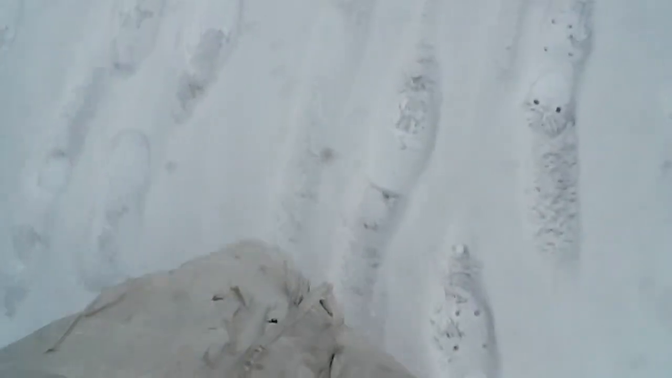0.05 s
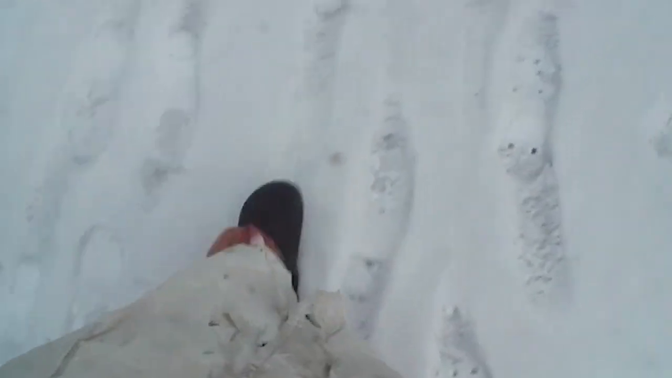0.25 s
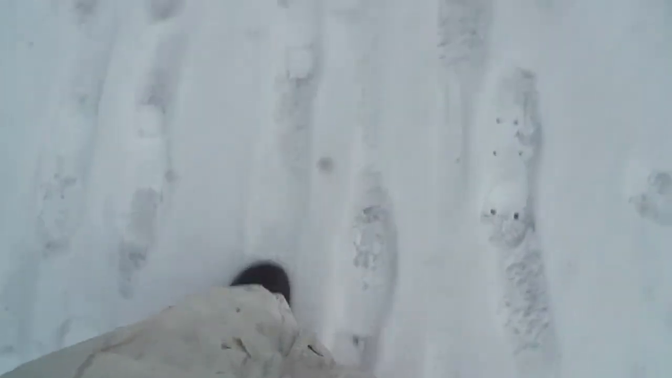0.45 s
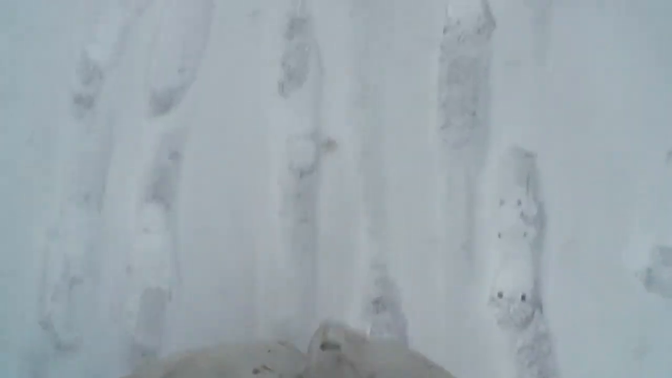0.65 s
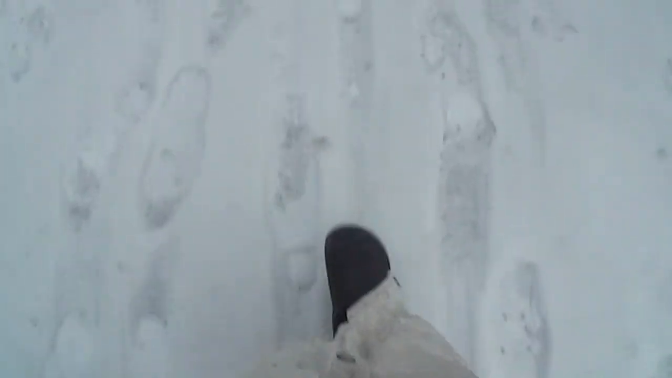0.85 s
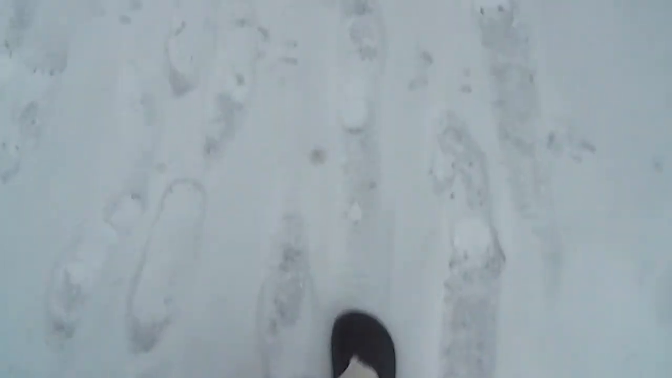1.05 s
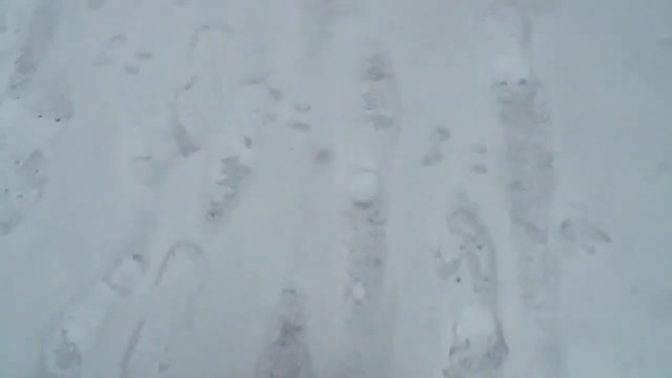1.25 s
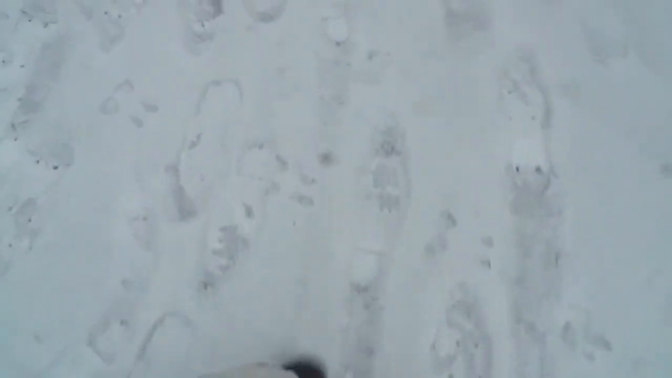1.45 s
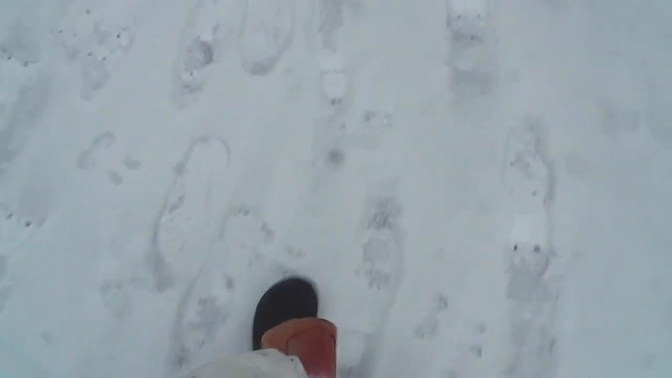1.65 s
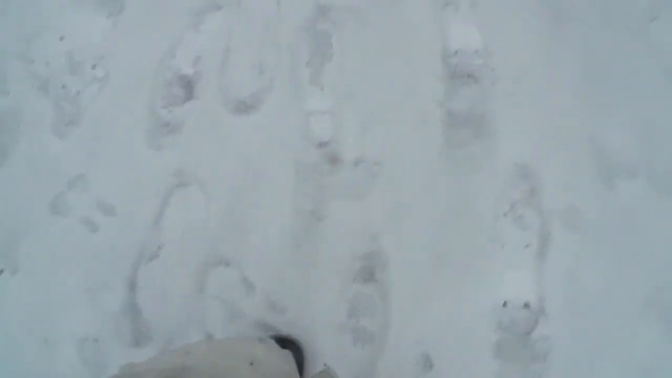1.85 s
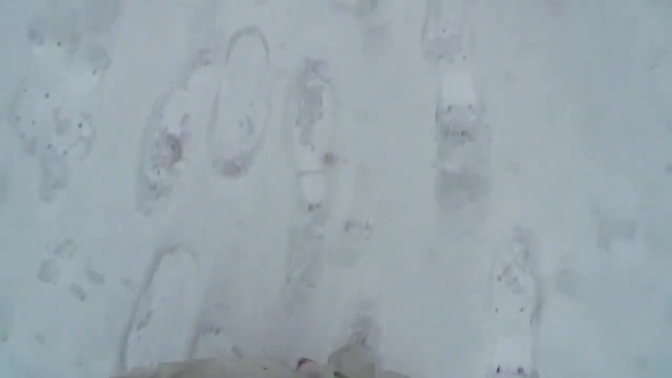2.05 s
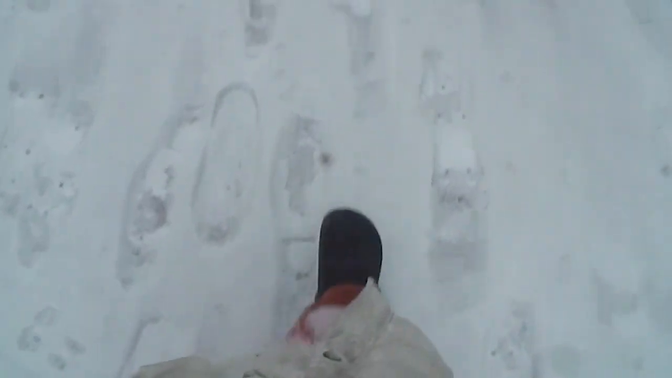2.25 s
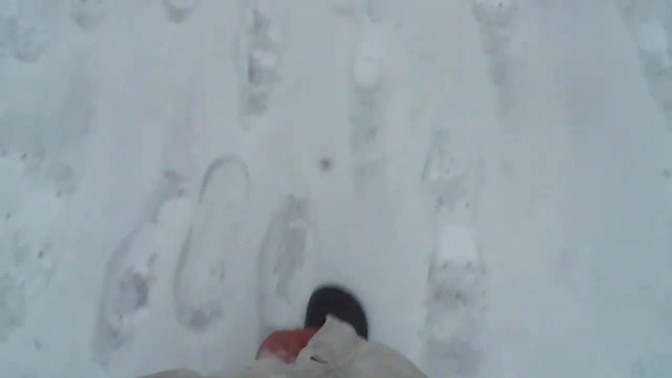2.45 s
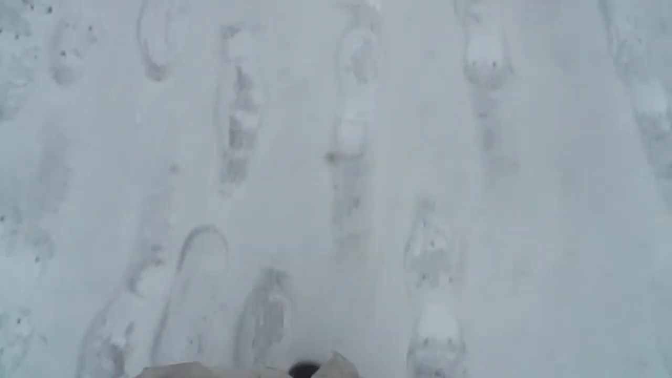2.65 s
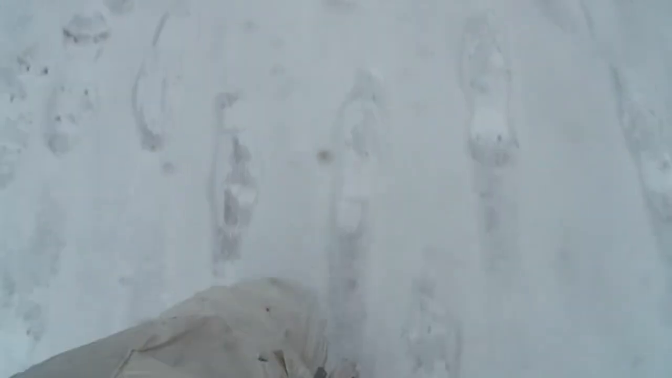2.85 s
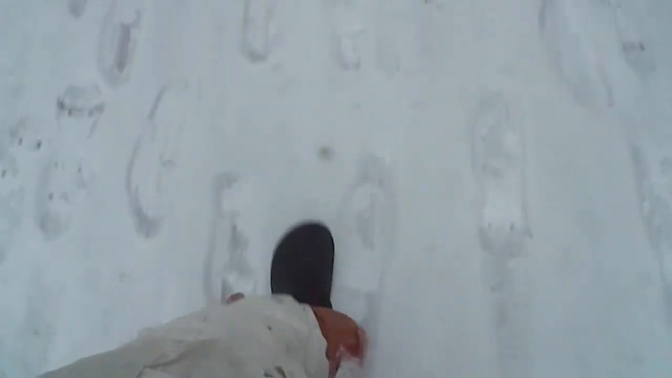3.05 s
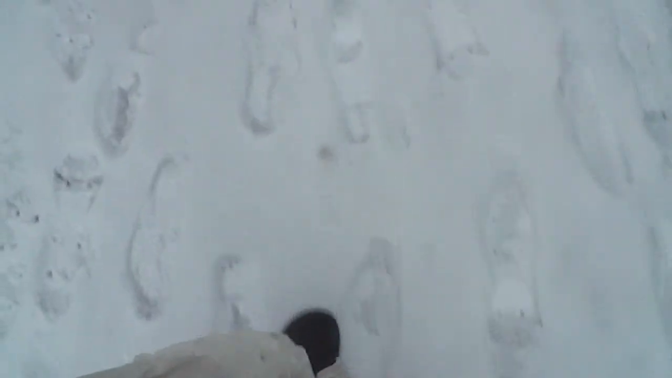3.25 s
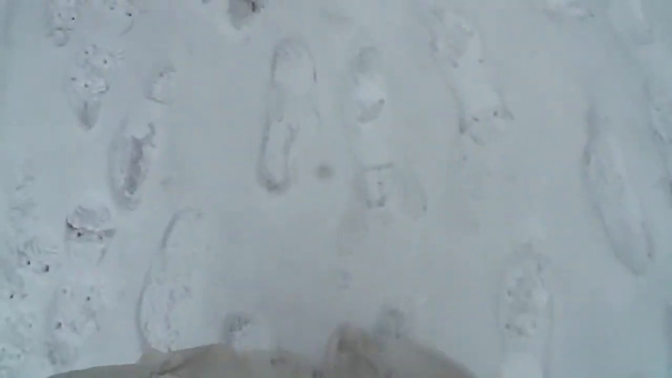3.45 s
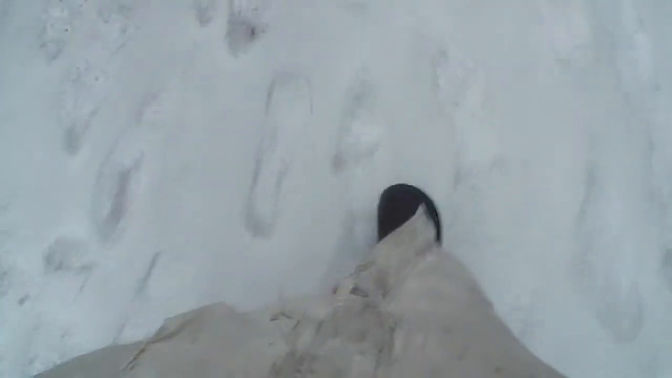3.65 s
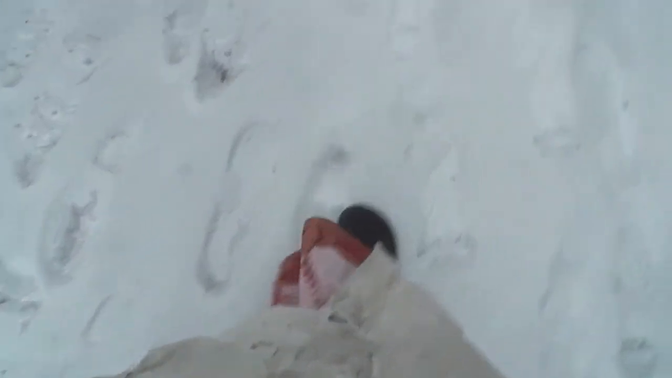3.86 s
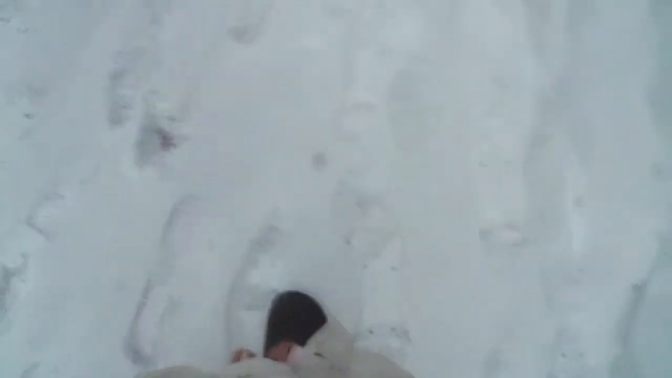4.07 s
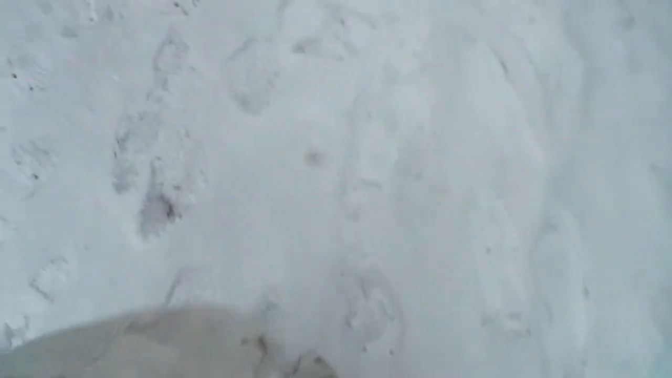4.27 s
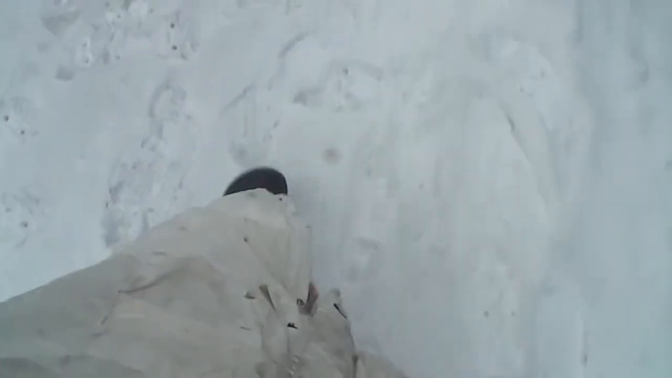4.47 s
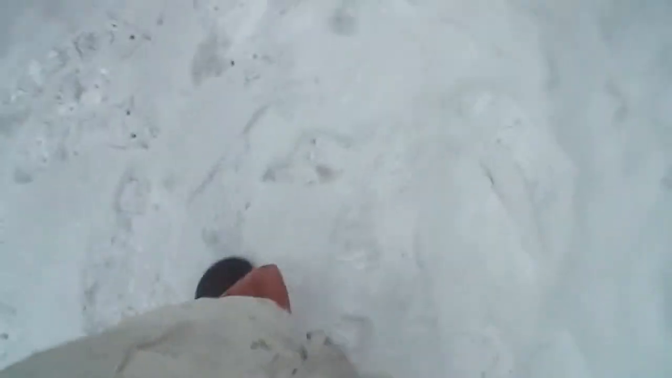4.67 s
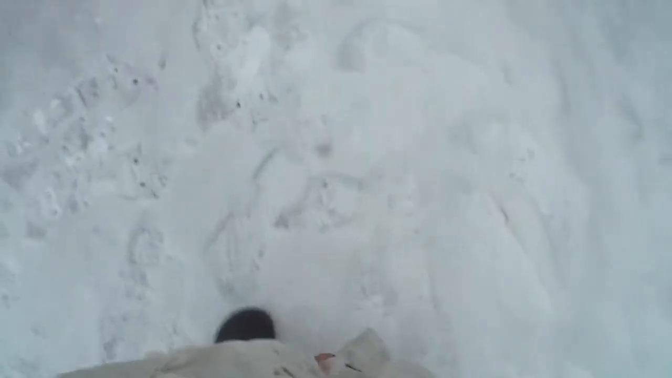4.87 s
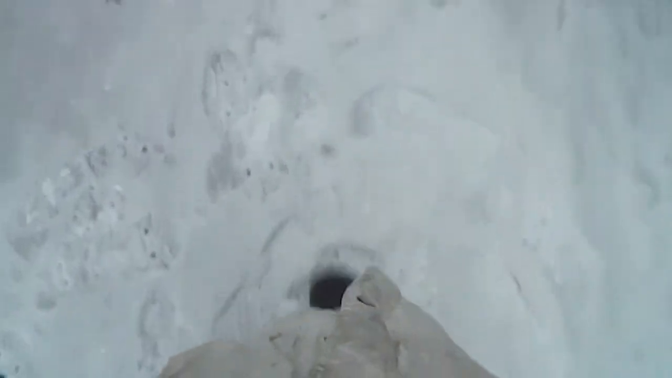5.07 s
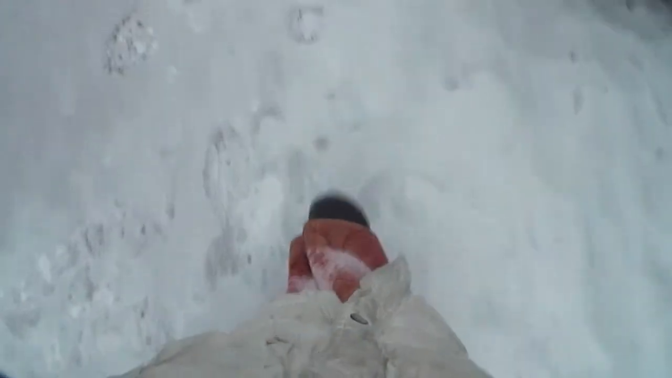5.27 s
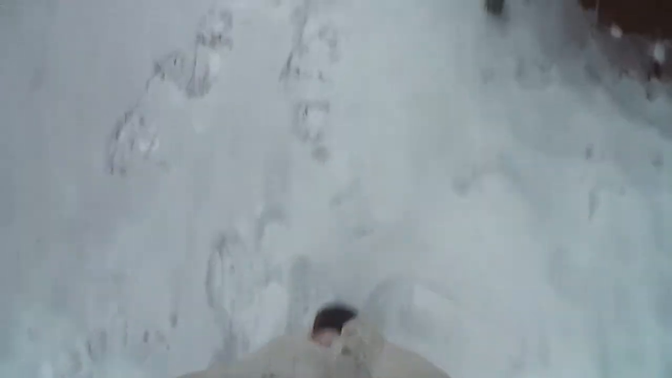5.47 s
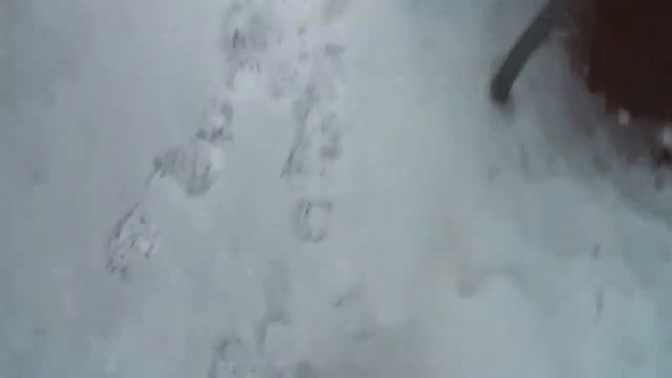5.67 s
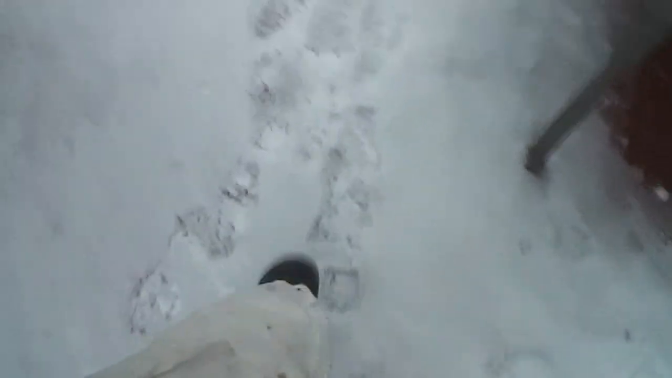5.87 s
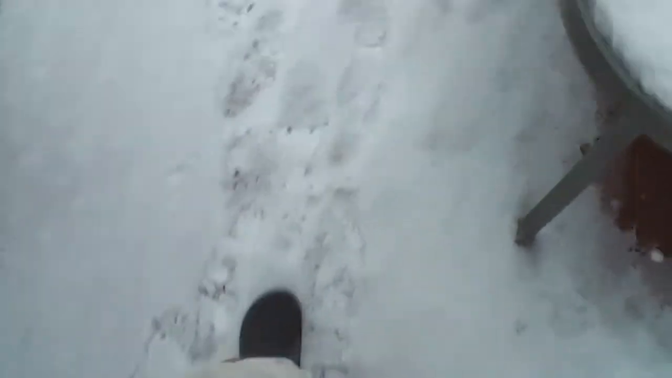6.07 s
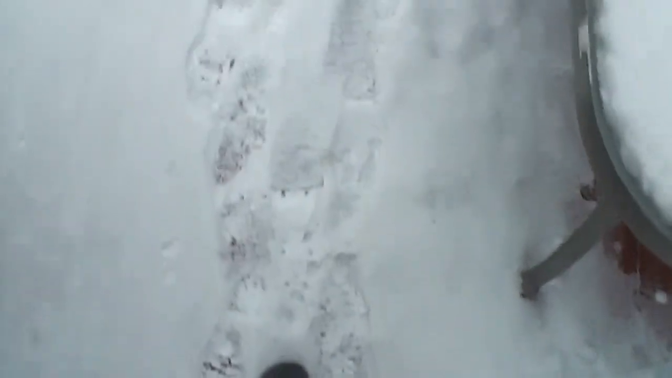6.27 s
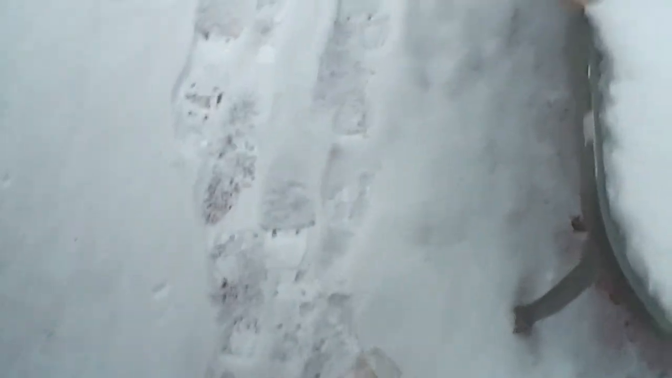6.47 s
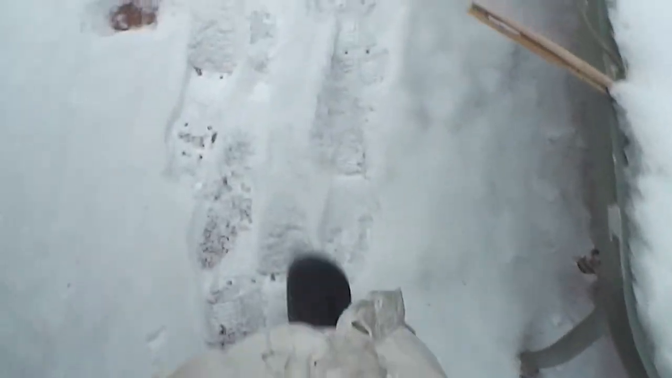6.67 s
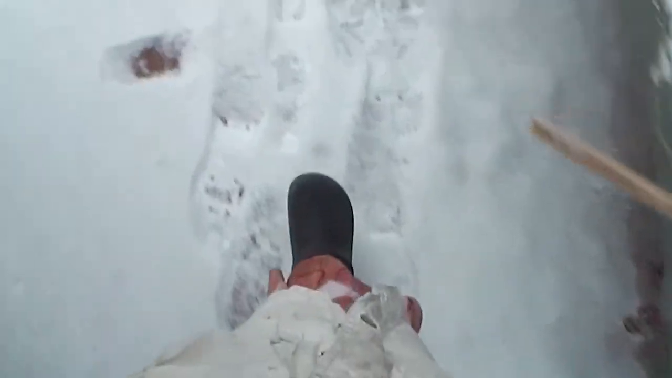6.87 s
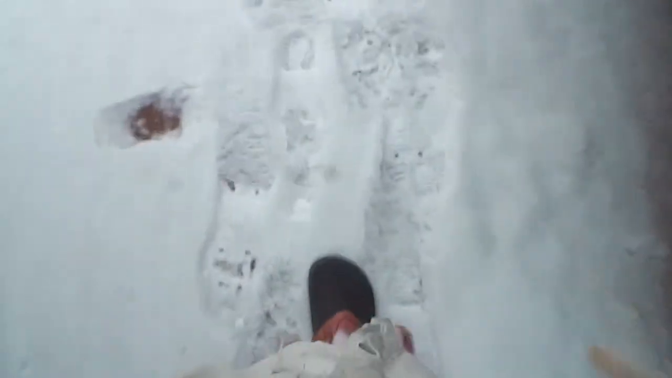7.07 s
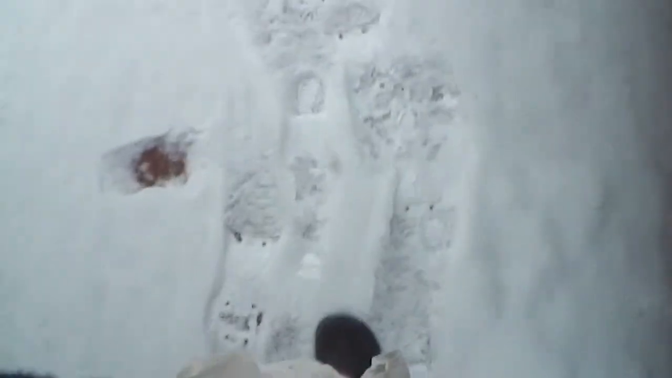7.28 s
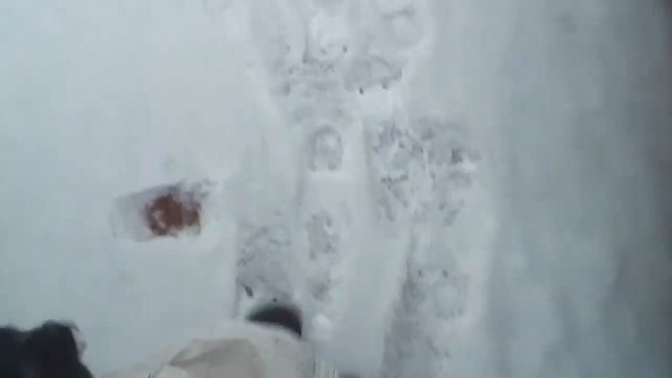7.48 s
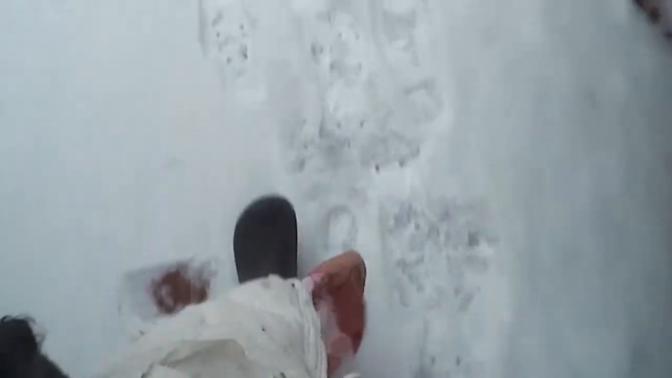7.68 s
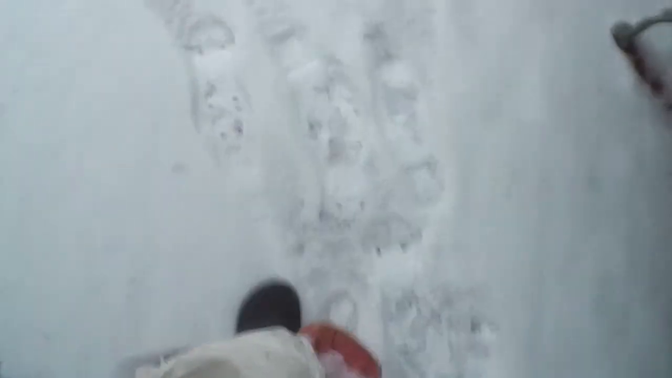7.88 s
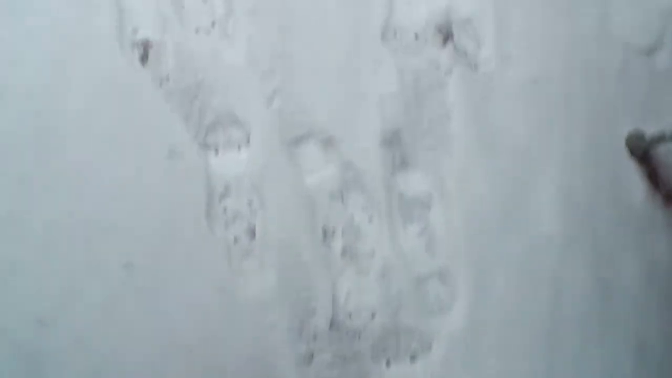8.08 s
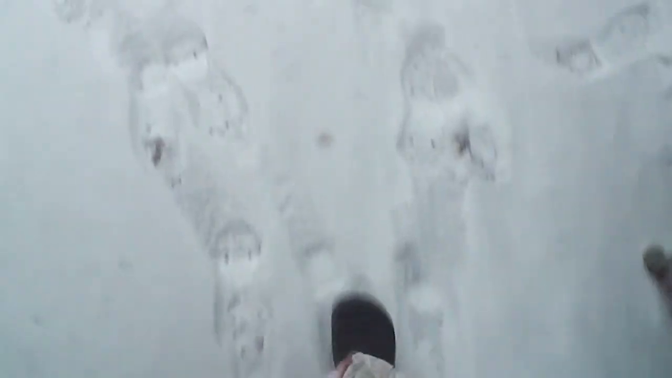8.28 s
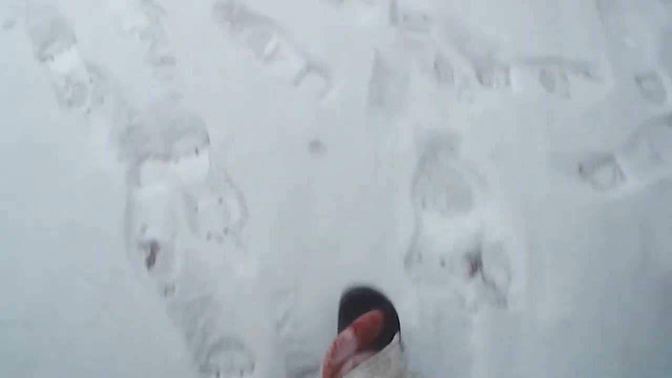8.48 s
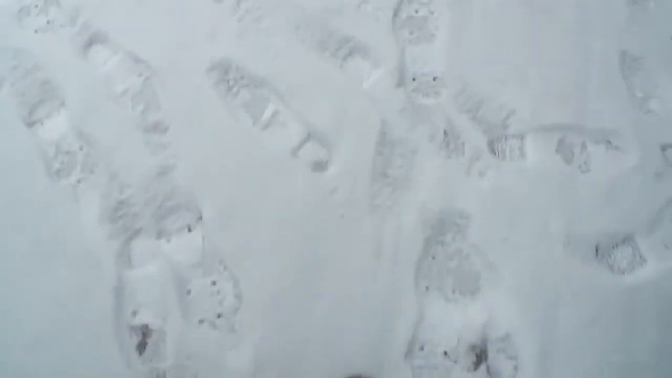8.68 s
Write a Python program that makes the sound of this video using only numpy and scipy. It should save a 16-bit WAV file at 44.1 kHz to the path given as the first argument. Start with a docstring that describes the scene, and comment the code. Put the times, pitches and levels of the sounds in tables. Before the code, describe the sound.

Outdoors in quiet air, boots crush crisp snow at a regular walking pace, heard near and slightly below in dry stereo. Heels break in with low, crumbly crunches; soles follow with a denser crackling crush, brittle snaps and fine icy hiss. Loose crumbs tick between a few steps. Thin bird whistles appear faintly from about two seconds, then a quick group of buzzy chirps near seven seconds as the air grows slightly louder.

```python
"""Quiet open air, a filtered noise, lasts throughout; from the start someone walks below us through crusty snow.
Each step begins as a heel breaks in with a few dull crunches: short pops with crumbling grains and a boot thud.
Then the crust collapses and the sole crushes the snow in a shower of small pops, sharp cracks and icy fizz.
From about two seconds, small birds now and then give faint gliding whistles; loose crumbs tick on the crust.
Late in the walk the birds' buzzy calls are clearer and the air is a little louder."""
import sys
import numpy as np
from scipy import signal
from scipy.io import wavfile
from scipy.ndimage import uniform_filter1d

SR = 44100
rng = np.random.default_rng(int(sys.argv[2]) if len(sys.argv) > 2 else 0)


def put_to_file(sound):
    """Save the sound as 16-bit audio at rate SR, in the file named by the first command-line argument."""
    columns = np.atleast_2d(sound).T  # one column per channel
    safe = np.clip(columns, -1, 1)
    whole_steps = np.round(safe * 32767)
    wavfile.write(sys.argv[1], SR, whole_steps.astype(np.int16))


N = 384993
T = np.arange(SR // 5) / SR  # time inside one short sound [s]
MIDDLE_S = T.mean()
EDGE_HZ = 16100  # nothing much is heard above this

# still outdoor air, its colour: (frequency [Hz], level per Hz [dB])
AIR_COLOUR = [(18, -35), (30, -4), (540, 12), (616, 11), (1220, 9), (3060, -6.5), (7470, -6.5), (8300, -12),
              (9970, -13), (14400, -13), (16000, -15)]
# slow drift added to the air's level: (time [s], change [dB])
AIR_LEVEL_DRIFT = [(0, 1), (2.7, -0.5), (4.3, 0), (5.1, -0.5), (6.8, 4.5), (8.7, 5)]
AIR_DB = -49  # before the drift
# bird calls: (time [s], length [s], start pitch [Hz], end pitch [Hz], level [dB], buzz [0-1])
BIRD_CALLS = [(1.963, 0.051, 5100, 4100, -67, 0.1), (2.002, 0.049, 6900, 8100, -61, 0.2),
              (3.793, 0.11, 5000, 4500, -58, 0.4), (5.14, 0.066, 7900, 7200, -65, 0.1),
              (5.81, 0.07, 4630, 4700, -61, 0.34), (6.68, 0.06, 5700, 7160, -46.5, 0.7),
              (6.776, 0.037, 4830, 6360, -49.5, 0.65), (6.86, 0.054, 5150, 6600, -46, 0.7)]

# colour of breaking snow: (frequency [Hz], level per Hz [dB])
SNOW_COLOUR = [(18, -35), (30, -6), (86, 8), (215, -4), (336, 4), (415, 2.5), (512, 7), (649, 0),
               (1040, -4.5), (1860, -8), (2830, -20.5), (3770, -16.5), (7870, -22.5), (14800, -30),
               (16000, -39)]
# hollow ring of a boot on packed snow, before each blow detunes it:
# (pitch [Hz], time to fall by 60 dB [s], level among the modes [dB])
BOOT_MODES = [(125, 0.33, -16.5), (180.6, 0.21, -2.5), (228.4, 0.25, 0), (298.2, 0.12, 4.5),
              (371.6, 0.14, 4.5)]

# loose crumbs of crust skitter from a swinging boot: (time [s], length [s], level [dB])
CRUMB_FALLS = [(2.885, 0.21, -48), (7.27, 0.21, -50.5), (7.516, 0.32, -52.5)]
# dull crunches, as a boot packs the snow:
# (time [s], level over 10 ms [dB], pitch [Hz], boot thud relative to the crunch [dB])
DULL_CRUNCHES = [(0.022, -21.5, 700, 0), (0.091, -22.5, 615, -6), (0.15, -23, 875, -1),
                 (0.231, -26, 910, 1.5), (0.295, -19.5, 720, -1), (0.692, -22.5, 1130, 0.5),
                 (0.819, -23.5, 955, 4), (0.892, -24.5, 810, 2), (0.947, -24, 860, -4),
                 (0.98, -25, 1030, -11), (1.007, -20.5, 760, 1.5), (1.414, -23, 790, 1),
                 (1.47, -28, 812, -4), (1.509, -19, 790, 0), (1.575, -21, 900, -8), (1.614, -24, 700, 3),
                 (1.667, -25.5, 620, 1.5), (2.042, -28.5, 1060, -4), (2.076, -25, 1040, 0.5),
                 (2.119, -32.5, 1060, 2), (2.224, -24.5, 880, -3.5), (2.336, -21, 810, -0.5),
                 (2.375, -18.5, 910, 0), (2.791, -22, 1150, -4), (2.831, -24.5, 930, 0),
                 (2.857, -20, 806, -2), (2.892, -20.5, 810, -3), (2.934, -24.5, 840, -13),
                 (2.97, -21, 720, 0), (3.007, -20.5, 560, -4), (3.062, -19, 550, 1), (3.365, -19, 1150, -8),
                 (3.522, -19.5, 1100, -3.5), (3.622, -16, 1160, 0), (3.648, -26, 910, 8),
                 (3.693, -17, 780, -2.5), (3.737, -25, 870, 4), (3.811, -30, 870, -13),
                 (3.913, -14.5, 1110, -4.5), (4.433, -18, 846, -4), (4.529, -22.5, 870, -6),
                 (4.618, -25.5, 625, -2.5), (5.213, -21, 1120, -6.5), (5.257, -21, 1190, -12),
                 (5.635, -13, 935, -15.5), (5.713, -23, 1180, -3), (5.884, -35, 845, -4),
                 (5.951, -17.5, 1350, -9.5), (6.044, -21.5, 1010, -5), (6.474, -22, 920, -9),
                 (6.647, -30.5, 795, 0.5), (6.851, -24.5, 860, -10), (6.915, -17.5, 634, -0.5),
                 (6.988, -17, 725, -3), (7.492, -27.5, 970, -7), (7.66, -24.5, 915, -3.5),
                 (8.153, -23, 615, -1), (8.297, -29.5, 885, 0.5), (8.378, -23, 1320, -1),
                 (8.469, -21, 790, -2), (8.521, -21.5, 1255, -6)]
# sharp cracks of the icy crust: (time [s], level over 10 ms [dB], ice fizz relative to the crack [dB])
SHARP_CRACKS = [(0.5681, -21, -21), (0.6004, -21, -19), (1.1667, -23, -25), (1.239, -25, -23),
                (1.3458, -30, -16), (1.8509, -23, -18), (1.8854, -24, -13), (2.0125, -39, -11),
                (2.5946, -20, -17), (3.3042, -24, -14), (3.332, -19, -16), (3.4077, -25, -12),
                (3.4518, -23, -16), (3.4756, -23, -15), (3.5821, -26, -21), (4.0148, -20, -13),
                (4.0375, -15.5, -16), (4.0631, -22, -8), (4.1168, -19, -12), (4.1495, -28, -8),
                (4.7207, -24, -18), (4.7744, -23, -18), (4.8354, -24, -12), (4.8724, -22, -12),
                (4.9156, -25, -12), (4.9491, -25, -14), (4.9722, -24, -10), (5.4317, -18, -23),
                (5.4556, -21, -18), (5.4737, -17, -14), (5.4909, -15, -16), (5.5647, -17, -17),
                (5.6553, -20, -10), (5.8029, -37, -6), (6.1283, -19, -19), (6.1774, -22, -11),
                (6.2084, -19, -10), (6.247, -22, -20), (6.3212, -20, -15), (6.3623, -20, -17),
                (6.3909, -24, -7), (7.1807, -23, -13), (7.198, -20, -4), (7.2186, -20, -3),
                (7.307, -25, -6), (7.4366, -25, -7), (7.688, -27, -4), (7.736, -29, -5), (7.9614, -23, -16),
                (8.657, -19, -23), (8.6807, -21, -16)]
# a whole patch of crust collapses at once: (middle [s], level over 10 ms [dB],
# half length before a slight widening [s], pitch [Hz], ice fizz relative to the collapse level [dB])
CRUST_COLLAPSES = [(0.361, -16, 0.027, 1030, -18), (1.058, -14, 0.027, 910, -27),
                   (1.139, -16, 0.054, 846, -18.5), (3.11, -12, 0.014, 1060, -16.5),
                   (3.937, -18, 0.019, 1040, -28), (4.648, -12, 0.0063, 1030, -12.5),
                   (5.354, -12.5, 0.02, 970, -20), (6.078, -14.5, 0.017, 1160, -5),
                   (7.029, -18, 0.0072, 1190, -9), (7.081, -18, 0.0032, 570, -30),
                   (7.777, -15.5, 0.013, 555, -7.5), (8.559, -15.5, 0.022, 1050, -13)]
# each step, heel then sole: (heel down [s], heel length [s], heel load [dB],
# sole down [s], sole length [s], sole load [dB], easing of the sole load [dB per s],
# boot thud [dB], ice fizz [dB], deep rumble [dB], note of the hollow [Hz], gain of its ring [dB]);
# thud, fizz and rumble are relative to the load; crushing() then trims grains, thud and fizz
WALKING_STEPS = [(0.028, 0.057, -26.5, 0.31, 0.33, -22.5, 16, 0.5, -19, -26, 285, -7.5),
                 (0.829, 0.2, -34.5, 1.02, 0.37, -19, 44.5, -7, -17.5, -22, 191, -1.5),
                 (1.43, 0.25, -43.5, 1.677, 0.21, -21, 16, -3.5, -18.5, -24.5, 325, -5),
                 (2.238, 0.12, -32, 2.38, 0.23, -19, 17, -2.5, -17.5, -25, 292, 4),
                 (2.83, 0.26, -33.5, 3.10, 0.82, -19, 27, -5, -15.5, -36, 322, 1.5),
                 (3.629, 0.097, -29.5, 3.90, 0.24, -23, -3, -2.5, -13, -31, 323, -7),
                 (4.439, 0.012, -51, 4.66, 0.32, -23, 23.5, -3.5, -14, -30, 185, -4.5),
                 (5.219, 0.12, -29, 5.33, 0.33, -21.5, 7.5, -13, -15, -27.5, 197, -5.5),
                 (5.961, 0.062, -36.5, 6.04, 0.35, -18.5, 19.5, -4.5, -16, -32, 294, -5),
                 (6.92, 0.065, -31.5, 7.01, 0.19, -25, -12.5, -3.5, -9.5, -23, 324, -5),
                 (7.67, 0.12, -32.5, 7.76, 0.27, -25, 8, -5.5, -17, -24.5, 310, -2.5),
                 (8.39, 0.066, -36, 8.53, 0.17, -22.5, -6, -9, -16.5, -26, 288, -5)]
# light shifts and brushes of the boots between steps:
# (time [s], length [s], load [dB], boot thud [dB], ice fizz [dB]), the last two relative to the load
BOOT_SHIFTS = [(2.03, 0.092, -39, 12, -13), (3.53, 0.093, -41.5, 8.5, -21), (3.864, 0.032, -35.5, 0, -5.5),
               (4.27, 0.1, -53.5, 0, -2), (6.48, 0.13, -30.5, -3, -18), (7.28, 0.24, -49, 9, -2),
               (8.03, 0.077, -34.5, -4, -13), (8.16, 0.18, -39, 1.5, -15.5)]

# time from the first yielding grains to the break itself
LEAD_S = 0.008
# the weight comes on quickly and leaves steadily
ATTACK_S, RELEASE_DB_PER_S = 0.025, 279
# the snow settles after each crunch: load relative to the crunch, and how fast it dies away
SETTLE_DB, SETTLE_DB_PER_S = -5, 419
# a harder crunch is mostly more pop: a crunch at TYPICAL_DB has fizz at CRUNCH_FIZZ_DB,
# and each further dB of crunch adds only FIZZ_GROWTH dB of fizz
TYPICAL_DB, CRUNCH_FIZZ_DB, FIZZ_GROWTH = -23, -42.5, 0.62
# a heel packs the snow: much thud, little ice and rumble (relative to its load, before the trims)
HEEL_THUD_DB, HEEL_FIZZ_DB, HEEL_RUMBLE_DB = 7, -16.5, -42
# small fractures pause before a large break: how early, how wide the dip is, how deep
PAUSE_LEAD_S, PAUSE_S, PAUSE_DB = 0.0088, 0.0068, -3.5
# fractures for each size of slab: under a light touch, and added at the full load
LIGHT_PER_S, LOAD_PER_S = 55, 260
# brittle ice ticks under the load: how many, and their level relative to the fizz
TICKS_PER_S, TICKS_DB = 50, -11
# ice ticks ring between these pitches, with this sharpness
TICK_LOW_HZ, TICK_HIGH_HZ, TICK_Q = 4000, 13100, 2.9
# unevenness of the scatter from legs and coat
SCATTER_SPREAD_DB = 6


def amp(db):
    """Turns decibels into gain."""
    return 10 ** (np.asarray(db) / 20)


def evened(x):
    """Scales a sound to an average strength (rms) of 1."""
    return x / np.sqrt(np.mean(x ** 2) + 1e-20)


def unit(x):
    """Scales a sound to an average energy of 1 per channel."""
    return evened(x) / np.sqrt(x.shape[-1])


def sized(x, db):
    """Gives a short sound the energy of 10 ms at the level db."""
    return amp(db) * unit(x) * np.sqrt(SR / 100)


def add(mix, s, sound):
    """Adds a sound into the mix at time s, or at the very start if s is negative."""
    start = max(round(s * SR), 0)
    part = mix[:, start:][:, :sound.shape[-1]]
    part += sound[..., :part.shape[1]]


def through(x, response):
    """Sends every channel through a response (convolution)."""
    shaped = response.reshape((1,) * (x.ndim - 1) + (-1,))
    return signal.oaconvolve(x, shaped, axes=-1)[..., :x.shape[-1]]


def causal(points, size=4096):
    """Makes the most prompt response (minimum phase) with the given spectrum."""
    hz, db = np.transpose(points)
    bins_hz = abs(np.fft.fftfreq(size, 1 / SR)) + 1
    log_gain = np.log(amp(np.interp(np.log(bins_hz), np.log(hz), db)))
    spectrum = np.exp(np.conj(signal.hilbert(log_gain)))
    return np.fft.ifft(spectrum).real[:size // 2]


def cut(x, hz, kind, order):
    """Removes sound above (low-pass) or below (high-pass) a frequency."""
    return signal.sosfilt(signal.butter(order, hz, kind, fs=SR, output="sos"), x)


def ring(hz, t60):
    """One mode: a sine that dies away by 60 dB in t60 seconds."""
    return np.sin(2 * np.pi * hz * T) * np.exp(-np.log(1000) * T / t60)


def clicks(size, per_s, spread_db):
    """Sparse fractures at random times, most small, a few large."""
    chance, sign, strength = rng.random((3, size))
    size_db = spread_db * np.minimum(-np.log(1 - strength), 4)
    return (chance < per_s / SR) * np.sign(sign - 0.5) * amp(size_db)


def pair(x, apart):
    """Makes left and right from a shared signal and an unrelated difference."""
    shared, difference = x[0], apart * x[1]
    return np.array([shared + difference, shared - difference]) / np.sqrt(1 + apart ** 2)


def air():
    """Open air: soft coloured noise that drifts slowly in level."""
    drift_db = np.interp(np.arange(N) / SR, *np.transpose(AIR_LEVEL_DRIFT))
    noise = pair(rng.standard_normal((2, N)), apart=0.42)
    return amp(AIR_DB + drift_db) * evened(through(noise, causal(AIR_COLOUR)))


def birds():
    """Bird calls: thin gliding whistles; a buzzy call scatters its pitch."""
    out = np.zeros((2, N))
    for s, length, start_hz, end_hz, db, buzz in BIRD_CALLS:
        size = round(length * SR)
        flutter = evened(uniform_filter1d(rng.standard_normal(len(T)), size=16))[:size]
        hz = np.linspace(start_hz, end_hz, size) + 900 * buzz * flutter
        whistle = np.sin(2 * np.pi * np.cumsum(hz) / SR) * np.hanning(size)
        add(out, s, amp(db) * evened(whistle))
    return out


def surroundings(x):
    """A dull bounce from the ground, then faint scatter from legs and coat, different left and right."""
    delay = (np.arange(len(T)) == round(0.0068 * SR)) * 1.0
    bounce = amp(-19) * cut(through(x, delay), 610, "low", order=2)
    fade = np.exp(-T / 0.005) * (T > 0.001)
    scatter = [unit(clicks(len(T), per_s=4600, spread_db=SCATTER_SPREAD_DB) * fade) for _ in x]
    return bounce + amp(-13) * np.array([through(channel, taps) for channel, taps in zip(x, scatter)])


def hollow(x):
    """The pocket under the sole rings at a low note that changes from step to step."""
    heel_s, *_, hz, ring_db = np.transpose(WALKING_STEPS)
    step = np.maximum(np.searchsorted(heel_s, np.arange(N) / SR) - 1, 0)
    # shift the note down to 0 Hz, smooth there, and shift it back: a resonance that can change pitch
    turn = np.exp(2j * np.pi * np.cumsum(hz[step]) / SR)
    pole = np.exp(-np.pi * 55 / SR)  # 55 Hz wide
    smoothed = signal.lfilter([1 - pole], [1, -pole], amp(ring_db[step]) * x / turn)
    return 2 * (turn * smoothed).real


def voices():
    """What one fracture sounds like: the pop of the snow, and the tick of ice crystals."""
    snow = causal(SNOW_COLOUR)
    pop = cut(cut(snow, 445, "high", order=2), 3320, "low", order=4)
    return pop, unit(cut(snow, 2700, "high", order=3))


def crystals(envelope, tick):
    """Countless ice crystals snap, a little differently left and right."""
    snaps = np.array([clicks(len(envelope), per_s=12000, spread_db=0.5) for _ in range(2)])
    return through(pair(snaps, apart=0.37) * envelope, tick)


def ice_ticks(size, per_s, tick):
    """Single bright snaps of ice, each size with its own pitch, scattered from left to right."""
    side = rng.uniform(0, np.pi / 2, size)
    snaps = clicks(size, per_s=per_s, spread_db=4.5) * np.array([np.cos(side), np.sin(side)])
    pitches = np.geomspace(TICK_LOW_HZ, TICK_HIGH_HZ, num=6)
    kind = rng.integers(0, len(pitches), size)
    rung = np.zeros((2, size))
    for k, hz in enumerate(pitches):
        rung += signal.lfilter(*signal.iirpeak(hz, TICK_Q, fs=SR), snaps * (kind == k) + 1e-20)
    return evened(through(rung, tick))


def skitters(tick):
    """Loose crumbs of ice land on the crust as runs of ticks."""
    out = np.zeros((2, N))
    for s, length, db in CRUMB_FALLS:
        add(out, s, amp(db) * ice_ticks(SR, 88, tick)[:, :round(length * SR)])
    return out


def slab(pop, hz, q=3.7):
    """A breaking slab colours the pop; a smaller one sounds higher and brighter."""
    hz = np.clip(hz, 300, 3000)
    tone = signal.lfilter(*signal.iirpeak(hz, q, fs=SR), pop)
    dulled = cut(pop, 3.57 * hz, "low", order=2)
    return -unit(unit(dulled) + 0.76 * unit(tone))


def thud():
    """The boot rings in several low modes, a little different at every blow."""
    detune = 1 + 0.065 * rng.standard_normal(len(BOOT_MODES))
    modes = np.zeros(len(T))
    for (hz, t60, db), factor in zip(BOOT_MODES, detune):
        modes += amp(db) * ring(hz * factor, t60) * rng.choice([-1, 1])
    onset = 1 - np.exp(-T / 0.0031)
    return unit(cut(modes, 480, "low", order=3) * onset)


def fracture(pop, tick, thud_db, fizz_db, crumble_s, crumble_db, fizz_s):
    """A few grains give way, the slab breaks, and fragments crumble after it while the boot rings."""
    after = T - LEAD_S
    rise = np.exp(np.minimum(after, 0) / 0.0017)
    fade = np.exp(-np.maximum(after, 0) / crumble_s)
    snap = (np.arange(len(T)) == round((LEAD_S - 0.0005) * SR)) * 1.0
    dip = 1 - 0.36 * np.exp(-(after / 0.00041) ** 2)  # fragments weaken briefly at the break
    fragments = clicks(len(T), per_s=4100, spread_db=4.5) * rise * fade * dip
    body = unit(through(snap, pop) + amp(crumble_db) * unit(through(fragments, pop)))
    fizz_fade = np.exp(-np.maximum(after, 0) / fizz_s) + 0.85 * fade
    fizz = unit(crystals(rise * fizz_fade, tick))
    boot = through(snap, thud())
    # the factor at the end gives the body the energy of 10 ms at full level
    return (body + amp(thud_db) * boot + amp(fizz_db) * fizz) * np.sqrt(SR / 100)


def crunch_fizz(db):
    """Ice fizz of a crunch in dB relative to it: a harder crunch has a smaller share."""
    return CRUNCH_FIZZ_DB + FIZZ_GROWTH * (db - TYPICAL_DB) - db


def breaks(pop, tick):
    """Dull crunches crumble for long and shake the boot; cracks are soon over; collapses swell and die."""
    out = np.zeros((2, N))
    for s, db, hz, thud_db in DULL_CRUNCHES:
        sound = fracture(slab(pop, hz), tick, thud_db, crunch_fizz(db),
                         crumble_s=0.011, crumble_db=0.5, fizz_s=0.00083)
        add(out, s - LEAD_S, amp(db) * sound)
    for s, db, fizz_db in SHARP_CRACKS:
        snap = slab(pop, 1150 * np.exp(0.2 * rng.standard_normal()), q=1.3)
        sound = fracture(snap, tick, thud_db=-9, fizz_db=fizz_db,
                         crumble_s=0.0025, crumble_db=-8, fizz_s=0.001)
        add(out, s - LEAD_S, amp(db) * sound)
    for s, db, half_s, hz, fizz_db in CRUST_COLLAPSES:
        swell = np.exp(-abs((T - MIDDLE_S) / (1.15 * half_s)) ** 1.46)
        shower = through(clicks(len(T), per_s=1300, spread_db=1.5) * swell, slab(pop, hz))
        fizz = sized(crystals(swell, tick), db + fizz_db)
        add(out, s - MIDDLE_S, sized(shower, db) + fizz)
    return out


def holding():
    """Just before a crunch or crack the crust bears the load, so the small fractures pause."""
    strain = np.zeros((1, N))
    pause = np.exp(-((T - MIDDLE_S + PAUSE_LEAD_S) / PAUSE_S) ** 2)
    for s, *_ in list(DULL_CRUNCHES) + list(SHARP_CRACKS):
        add(strain, s - MIDDLE_S, pause)
    return amp(PAUSE_DB * np.minimum(strain[0], 1))


def creaking():
    """Slabs of one size break in runs, so the colour of the crush shifts from moment to moment."""
    wander = uniform_filter1d(rng.standard_normal(N), size=1300)
    run = evened(uniform_filter1d(wander, size=700))
    return amp(4.5 * np.clip(run, -2, 2))


def press(length, db, easing_db_per_s=0, release_db_per_s=RELEASE_DB_PER_S):
    """Weight on the snow: it comes on, eases (or grows, if the easing is negative), and lifts."""
    t = np.arange(SR) / SR
    eased_db = easing_db_per_s * np.minimum(t, length)
    lifted_db = release_db_per_s * np.maximum(t - length, 0)
    return np.minimum(t / ATTACK_S, 1) * amp(db - eased_db - lifted_db)


def tread():
    """How hard the boots crush the snow, and the shares of boot thud, ice fizz and rumble in it."""
    heel_colour = (HEEL_THUD_DB, HEEL_FIZZ_DB, HEEL_RUMBLE_DB)
    presses = []
    for s, length, db, thud_db, fizz_db in BOOT_SHIFTS:
        presses.append((s, press(length, db), thud_db, fizz_db, HEEL_RUMBLE_DB))
    for heel_s, heel_length, heel_db, sole_s, sole_length, sole_db, easing, *colour_db, _, _ in WALKING_STEPS:
        presses.append((heel_s, press(heel_length, heel_db), *heel_colour))
        presses.append((sole_s, press(sole_length, sole_db, easing), *colour_db))
    for s, db, *_ in DULL_CRUNCHES:
        settling = press(0, db + SETTLE_DB, 0, SETTLE_DB_PER_S)
        presses.append((s, settling, 0, HEEL_FIZZ_DB, HEEL_RUMBLE_DB))
    power = np.zeros((4, N))  # overlapping presses add as power
    for s, weight, *colour_db in presses:
        add(power, s, (weight * amp([0, *colour_db])[:, None]) ** 2)
    crush, *parts = np.sqrt(power + 1e-14)
    return crush, *(parts / crush)


def crushing(pop, tick):
    """Under the boots, a shower of small fractures pops, shakes the boot and sheds crystals."""
    crush, thud_share, fizz_share, rumble_share = tread()
    pops = [slab(pop, hz, q=10.8) for hz in np.geomspace(680, 1550, num=8)]
    pace = LIGHT_PER_S + LOAD_PER_S * crush / crush.max()  # more load, more fractures a second
    trains = np.array([clicks(N, per_s=pace, spread_db=4) * creaking() for _ in pops])
    # the steady weight of the walker evens out the energy that is released
    trains /= np.sqrt(abs(uniform_filter1d((trains ** 2).sum(0), size=1500)) + 0.5)
    grains = evened(sum(through(train, voice) for train, voice in zip(trains, pops)))
    boot = evened(sum(through(train, thud()) for train in trains))
    # crystals go in a small avalanche around each fracture
    avalanche = np.exp(-abs(np.arange(-200, 201) / SR) / 0.0007)
    bursts = evened(np.sqrt(np.convolve((trains ** 2).sum(0), avalanche, "same")))
    fizz = evened(crystals(bursts + 0.25, tick))
    fizz = fizz + amp(TICKS_DB) * ice_ticks(N, TICKS_PER_S, tick)
    deep_noise = cut(rng.standard_normal(N), 93, "low", order=2)
    rumble = evened(cut(deep_noise, 57, "high", order=3))
    snow = holding() * (amp(-1.63) * grains + amp(0.4) * fizz_share * fizz)
    return crush * (snow + rumble_share * rumble + amp(-5.5) * thud_share * boot)


def scene():
    """Steps close below, birds and air around."""
    pop, tick = voices()
    steps = breaks(pop, tick) + crushing(pop, tick) + skitters(tick)
    return steps + hollow(steps) + surroundings(steps) + birds() + air()


def record(dry):
    """The left side has a little more bass, the right more treble; then the highest treble is removed."""
    low = signal.oaconvolve(dry, signal.firwin(63, 1900, fs=SR)[None], "same")
    tilted = low * amp([[0.5], [-0.5]]) + (dry - low) * amp([[-0.7], [0.7]])
    band = signal.firwin(511, EDGE_HZ, window=("kaiser", 9), fs=SR)
    return signal.oaconvolve(tilted, band[None], "same")


dry = scene()
out = record(dry)
put_to_file(out)
```